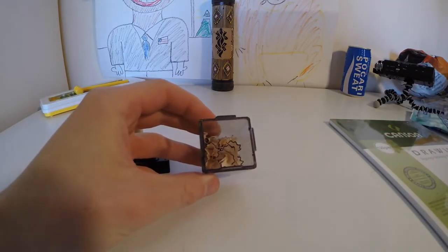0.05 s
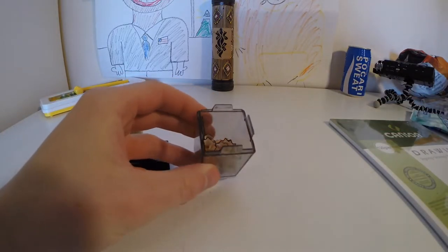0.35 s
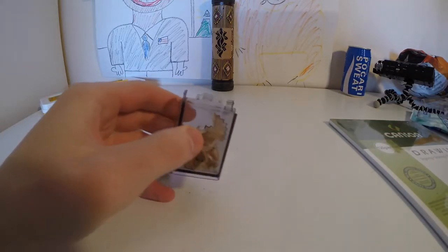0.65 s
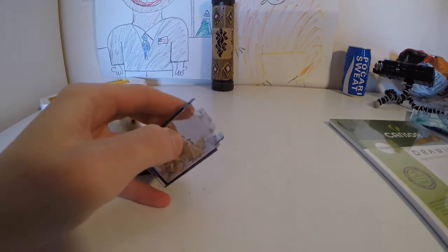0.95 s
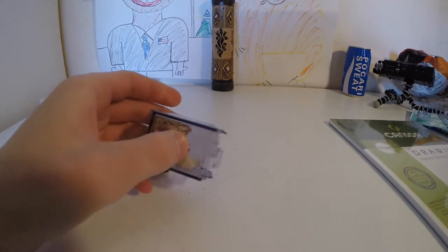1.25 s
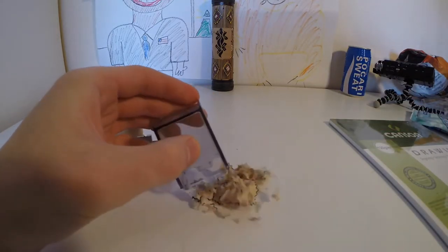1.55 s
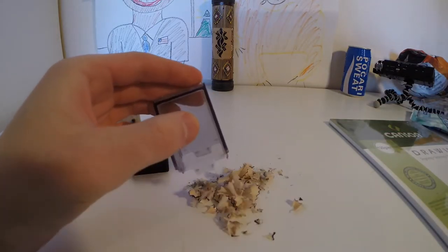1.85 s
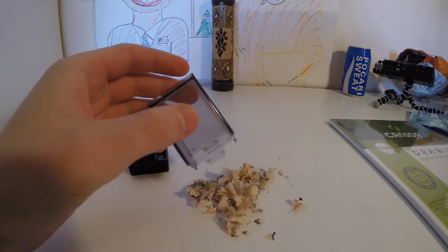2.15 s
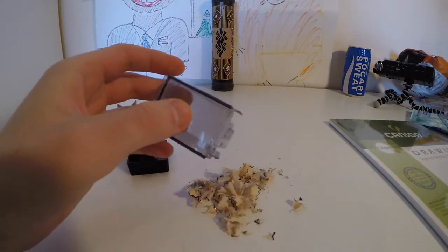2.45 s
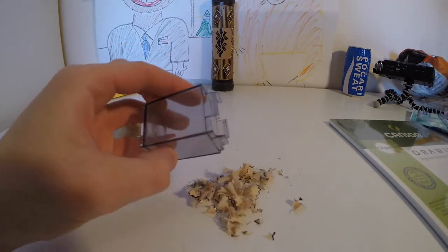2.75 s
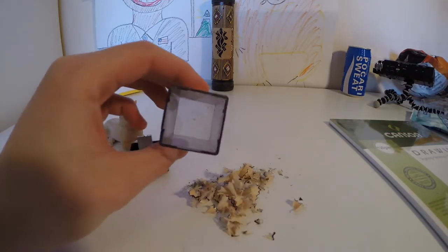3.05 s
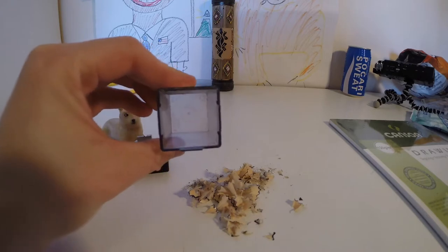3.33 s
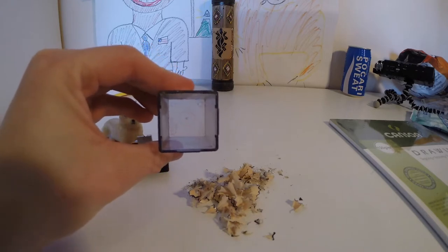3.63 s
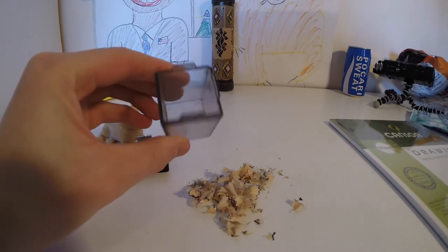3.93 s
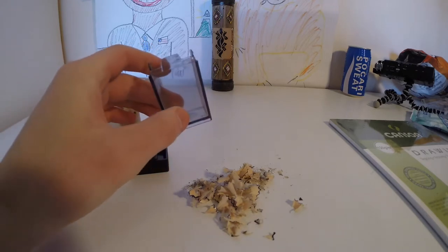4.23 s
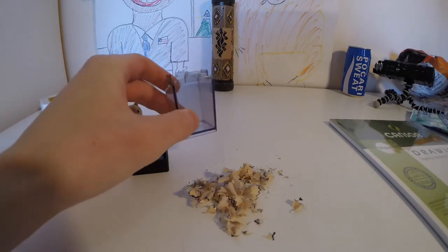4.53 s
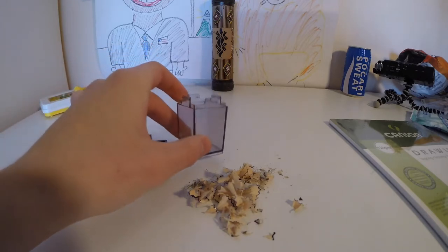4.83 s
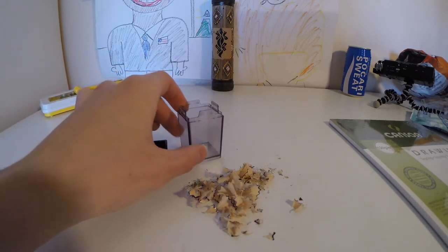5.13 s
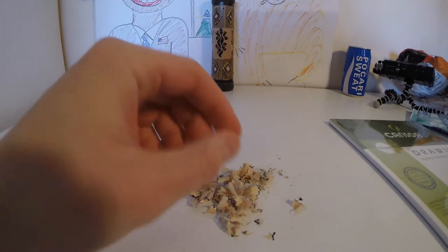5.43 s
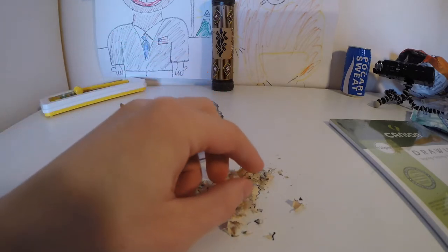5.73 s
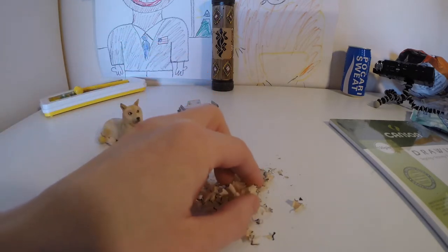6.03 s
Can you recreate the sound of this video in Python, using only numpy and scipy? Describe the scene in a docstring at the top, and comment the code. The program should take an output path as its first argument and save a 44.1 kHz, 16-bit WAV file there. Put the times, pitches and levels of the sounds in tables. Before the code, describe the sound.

In a quiet, softly rumbling room, dry shavings slide from a little plastic container that fingers scuff, then put down with a quick rattle.

```python
"""At a desk in a quiet room, a hand tips pencil shavings out of a small plastic box.
Fingertips drag, squeak and scuff on the plastic, and the dry flakes slide out in faint rustles of
tiny clicks. The box is bumped dully, set down on one edge and let fall onto its base: each knock
makes box and desk ring, the box chatters and squeaks briefly, and a faint ring swells and lingers.
Then the fingers stir the heap. Behind it all the room rumbles and hisses, with whines and one pip."""
import sys
import numpy as np
from scipy import signal
from scipy.fft import rfft, irfft
from scipy.io import wavfile

SR = 44100
rng = np.random.default_rng(int(sys.argv[2]) if len(sys.argv) > 2 else 0)


def unload_audio(sound):
    """Save the sound as a 16-bit wav file, at the path given as the first command line argument."""
    columns = np.transpose(np.atleast_2d(sound))
    # keep every value between -1 and 1, then stretch to whole-number steps
    steps = np.round(np.clip(columns, -1, 1) * 32767)
    wavfile.write(sys.argv[1], SR, steps.astype(np.int16))


N = 272538

# The tones that box and desk ring with. A ring time (t60) is the time taken to fade by 60 dB.
# (pitch [Hz], ring time [s], level bumped in the grip [dB], on an edge [dB], on the base [dB])
BOX_TONES = [(208, 0.095, -15, -14.5, -18), (278, 0.073, -10, -24, -23), (311, 0.09, -19, -19, -26),
             (383, 0.22, -12.5, -19, -30), (439.5, 0.212, -11, -11.5, -25),
             (482.5, 0.16, -11, -12.5, -15.5), (531.6, 0.143, -7, -23, -11.5), (569, 0.11, -7, -28, -11),
             (642, 0.037, -13, -21, -16.0), (710.0, 0.095, -2.5, -10.5, -9), (775, 0.073, -3.0, -14.5, -15),
             (813, 0.067, -19, -3, -3.5), (877, 0.13, -17.5, -5, -5.5), (938.6, 0.18, -19, -15.5, -6.5),
             (1008, 0.143, -19, -2, -2.5), (1120.0, 0.151, -4.5, -8, -5.5), (1219, 0.11, -17, -12.5, -18),
             (1360, 0.063, -11.5, -10.5, 1.0), (1420, 0.047, -12.0, -6.0, -3),
             (1510, 0.042, -5.5, -16, -12.0), (1652.0, 0.12, -23, -6, -10.5),
             (1768.0, 0.083, -24.0, -8, -1), (1954.0, 0.113, -20.0, -21.0, -12.5),
             (2118, 0.039, -4, -3.5, 2.0), (2203, 0.059, -5, -13.5, -5), (2840, 0.031, -30.0, -26.0, -13),
             (3010, 0.057, -30.0, -26.0, -5), (3350, 0.083, -29, -17, -8),
             (3690, 0.05, -30.0, -20.0, -10.5), (4297, 0.051, -29, -5, -0.5), (4710, 0.099, -30.0, -9, -13),
             (5250.0, 0.042, -30.0, -1, -16.5), (6200, 0.034, -30.0, -25.0, -7)]
# Knocks on the box. Hardness is the frequency above which a knock loses its treble.
# (time [s], level [dB], hardness [Hz], place of contact, rebounds [count])
KNOCKS = [(4.3985, -41, 1450, "grip", 0), (4.4075, -44, 1530, "grip", 0), (4.4253, -40.5, 950, "grip", 0),
          (4.4503, -39, 1440, "grip", 0), (4.470, -46, 776, "grip", 0), (4.537, -39.5, 910, "grip", 0),
          (4.5423, -42, 1640, "grip", 0), (5.0022, -30, 2280, "edge", 2), (5.055, -45, 1600, "base", 0),
          (5.069, -51, 850, "grip", 0), (5.0883, -43, 1450, "base", 0), (5.1227, -30.5, 2950, "base", 0),
          (5.1387, -31, 5530, "base", 0), (5.1411, -25.5, 3300, "base", 0), (5.2039, -50, 1000, "edge", 0)]
# The clack under each knock, made of many weaker tones: (frequency [Hz], level [dB])
CLACK_SPECTRUM = [(100, -16), (220, -9.5), (340, -11), (470, 0), (900, 3), (1400, 1), (2150, -2.5),
                  (2550, -10), (3100, -6), (4000, -12.5), (4700, -10), (5100, -12.5), (6500, -12),
                  (7500, -27), (14000, -8.5)]
# How the box bounces and rings at each place of contact:
# (first gap [s], level change per rebound [dB], ring time the fingers leave [share])
CONTACTS = {"grip": (0.011, -0.62, 0.77), "edge": (.0099, -4, 0.64), "base": (0.015, -1, 0.89)}
# The box catches and slips on skin or desk: (start [s], length [s], level [dB], pitch [Hz])
SQUEAKS = [(.970, 0.012, -53, 755), (4.407, 0.013, -48, 1134), (4.412, 0.0484, -43.5, 636),
           (5.06, .016, -49.5, 635), (5.087, 0.05, -41.5, 773.5), (5.203, 0.028, -50.5, 995)]
# The box drags on a fingertip or the desk: (start [s], length [s], level [dB], treble cutoff [Hz])
DRAGS = [(0.966, 0.066, -58, 850), (4.473, 0.046, -54, 850), (5.023, 0.025, -50, 1200)]
# Clumps of shavings slide out and are later stirred: (peak time [s], level [dB], length [s])
RUSTLES = [(1.435, -74, .12), (1.494, -59.5, 0.045), (1.544, -64.5, 0.062), (5.82, -70, 0.039),
           (5.905, -74, .06), (6.072, -72, 0.083), (6.17, -70, .09)]
# Resonances of the open box and the flakes in it: (pitch [Hz], width [Hz], level [dB])
HOLLOW_TONES = [(1460, 300, -2.5), (1750, 220, -4), (2870, 310, -5), (4540, 220, -9), (6140, 200, -7),
                (7420, 160, -10), (9250, 330, -18)]
# Flakes land, or the box ticks in the fingers: (time [s], level [dB], pitch [Hz], width [share of pitch])
TICKS = [(1.414, -62.5, 4430, .2), (1.484, -72, 8000, 0.54), (1.494, -71, 1750, 0.7),
         (1.489, -68, 6120, .06), (1.492, -67, 4580, .08), (1.495, -64.5, 2880, .15), (1.53, -74, 9000, .6),
         (1.584, -65.5, 2950, .2), (4.3005, -59, 2390, 1.9), (6.083, -65.5, 4650, 0.53)]
# Soft fingertip scuffs on the box: (peak time [s], level [dB], length [s], pitch [Hz], width [Hz])
SCUFFS = [(1.822, -67, .045, 3130, 1300), (1.834, -63, .04, 1550, 1000), (3.824, -60, 0.033, 1480, 400),
          (3.826, -67, .04, 3700, 2000)]
# Fine scratching as the emptied box turns in the fingers: (peak time [s], level [dB])
SCRATCH_STROKES = [(1.95, -85), (2.14, -86), (2.24, -84), (2.61, -85.5), (2.72, -88)]
# Echoes from the walls and things around the desk: (delay [s], gain [factor])
ECHOES = [(.0031, .25), (.0094, .2)]
# How long the room rings: (frequency [Hz], ring time [s])
ROOM_RING = [(200, 0.3), (1000, 0.24), (2200, 0.26), (7000, 0.18)]
# Steady rumble and hiss of the room: (frequency [Hz], relative level [dB])
ROOM_NOISE = [(8.8, -23), (15, 2.5), (59, -3), (105, -6), (140, -9.5), (181, -11.5), (257, -13.5),
              (374, -16), (500, -18.5), (546, -19), (1300, -24), (1900, -26.5), (2190, -27.5),
              (6050, -34.5), (15300, -51)]
# Faint, steady whines in the hiss: (pitch [Hz], width [Hz], level [dB])
WHINES = [(6160, 47, -88.5), (9860, 1300, -86), (12900, 690, -87)]


def box_knocks(clack_db=-4.5, clack_t60=0.071, build_s=0.00058,
               snap_db=-27, snap_t60=0.04, snap_top_hz=10000):
    """Each knock makes box and desk ring and clack; a softer contact leaves out the treble."""
    t, out = np.arange(SR // 4) / SR, np.zeros(N)
    hz, t60, *place_levels = np.transpose(BOX_TONES)[:, :, None]
    stagger = np.arange(len(hz))[:, None] ** 2  # the tones start out of step with each other
    waves = np.sin(2 * np.pi * hz * t + stagger)
    rings = {}  # the place of contact decides which tones sound, and how much the fingers damp them
    for (place, (*_, ring_share)), levels in zip(CONTACTS.items(), place_levels):
        tones = waves * amp(levels - 60 * t / (t60 * ring_share))
        rings[place] = hit_at_level(tones.sum(0), 0)
    build = 1 - np.exp(-t / build_s)  # the shaking takes a moment to spread over the desk
    for knock in KNOCKS:
        for s, db, hard_hz, place in chatter(*knock):
            clack = shaped_noise(CLACK_SPECTRUM, len(t)) * fade(t, clack_t60)
            body = build * (rings[place] + hit_at_level(clack, clack_db))
            add(out, s, hit_at_level(lowpass(body, hard_hz, order=4), db))
            snap = rng.standard_normal(len(t)) * fade(t, snap_t60)  # bright tick of plastic on the desk
            snap = lowpass(snap, snap_top_hz, order=6)
            add(out, s, hit_at_level(lowpass(snap, hard_hz, order=2), db + snap_db))
    return out


def chatter(s, db, hard_hz, place, rebounds, gap_share=0.7, hard_share=0.94):
    """Gives a knock and its rebounds, each sooner, weaker and softer than the one before."""
    gap_s, step_db, _ = CONTACTS[place]
    for k in range(round(rebounds) + 1):
        yield s, db + k * step_db, hard_hz * hard_share ** k, place
        s += gap_s * gap_share ** k


def box_squeaks(waver_share=0.015, waver_hz=120, octave_db=-17):
    """Quick sticking and slipping makes one low, slightly unsteady note with a weak octave above."""
    t, out = np.arange(SR // 10) / SR, np.zeros(N)
    for s, length, db, hz in SQUEAKS:
        waver = unit(lowpass(rng.standard_normal(len(t)), waver_hz, order=2))
        phase = 2 * np.pi * np.cumsum(hz * (1 + waver_share * waver)) / SR
        tone = unit(np.sin(phase) + amp(octave_db) * np.sin(2 * phase))
        loudness = held(0, length, rise_s=0.0025, fall_s=0.0047)[:len(t)]
        add(out, s, amp(db) * loudness * tone)
    return out


def box_drags(slips_per_s=1500, width_hz=53):
    """Many tiny slips stir the tones of the held box."""
    slips = random_slips(slips_per_s)
    body = sum(amp(grip_db) * resonate(slips, hz, width_hz) for hz, _, grip_db, *_ in BOX_TONES)
    out = np.zeros(N)
    for s, length, db, top_hz in DRAGS:
        loudness = amp(db) * held(s, length, rise_s=0.021, fall_s=0.04)
        out += loudness * unit(lowpass(body, top_hz, order=2))
    return out


def shavings(clicks_per_s=1500, spread_db=2.8, low_hz=1400, top_hz=10000):
    """Dry flakes brush each other and the box in many tiny clicks of uneven size."""
    sizes = amp(spread_db * np.minimum(rng.exponential(1, N), 3))
    signs = rng.choice([-1, 1], N)
    clicks = sizes * signs * (rng.random(N) < clicks_per_s / SR)
    clicks -= lowpass(clicks, low_hz, order=1)  # thins out the bass
    rustle = unit(lowpass(hollow_box(clicks, direct=0.11), top_hz, order=3))
    return rustle * sum(swell(*clump) for clump in RUSTLES)


def ticks(t60=0.041):
    """A landing flake or a light tick of the box is a short burst of noise around its own pitch."""
    t, out = np.arange(SR // 10) / SR, np.zeros(N)
    for s, db, hz, width_share in TICKS:
        burst = rng.standard_normal(len(t)) * fade(t, t60)
        tick = resonate_twice(burst, hz, width_share * hz)
        add(out, s, hit_at_level(hollow_box(tick, direct=1.0), db))
    return out


def hollow_box(x, direct):
    """The open box adds its resonances to a small sound; `direct` is the share that passes unchanged."""
    return direct * x + sum(amp(db) * resonate(x, hz, width) for hz, width, db in HOLLOW_TONES)


def finger_scuffs(slips_per_s=2500):
    """Skin slides a little on the plastic: a swell of tiny slips around one pitch."""
    slips = random_slips(slips_per_s)
    return sum(swell(s, db, length) * unit(resonate_twice(slips, hz, width))
               for s, db, length, hz, width in SCUFFS)


def fine_scratching(slips_per_s=30, unevenness=0.27, slip_t60=0.018, hz=9900, width_hz=1500):
    """The box turns in the fingers in separate, unevenly spaced slips, each a very short, high fizz."""
    gaps = np.exp(unevenness * rng.standard_normal(150)) / slips_per_s
    slip_fade = fade(np.arange(SR // 20) / SR, slip_t60)
    slips = np.zeros(N)
    for s in np.cumsum(gaps):
        add(slips, s, slip_fade)
    fizz = unit(resonate_twice(slips * rng.standard_normal(N), hz, width_hz))
    return fizz * sum(swell(s, db, length_s=0.17) for s, db in SCRATCH_STROKES)


def lingering_ring(ring_db=-72.5, hz=1905, width_hz=87):
    """A faint ring near 1.9 kHz swells and lingers around the knocks as the box is set down."""
    loudness = amp(ring_db) * held(start_s=4.68, length_s=0.99, rise_s=0.35, fall_s=0.35)
    return loudness * narrow_noise(hz, width_hz)


def room_echo(x, tail_db=-13, gap_s=0.0065):
    """The room adds two close echoes, then a short tail whose treble dies first."""
    hz, t, spectrum = signal.stft(rng.standard_normal(SR // 2), SR, nperseg=256)
    spectrum *= fade(t, look_up(ROOM_RING, hz)[:, None])
    _, tail = signal.istft(spectrum, SR, nperseg=256)
    response = np.zeros(SR)
    add(response, gap_s, amp(tail_db) * tail / np.linalg.norm(tail))
    for delay, gain in ECHOES:
        add(response, delay, [gain])
    return x + signal.fftconvolve(x, response)[:N]


def background(noise_db=-54.5, pip_db=-70, pip_hz=10980):
    """Room rumble and hiss with faint whines and one thin, high pip."""
    whines = sum(amp(db) * narrow_noise(hz, width) for hz, width, db in WHINES)
    steady = amp(noise_db) * shaped_noise(ROOM_NOISE, N)
    pip = amp(pip_db) * unit(np.sin(2 * np.pi * pip_hz * np.arange(N) / SR))
    pip *= held(start_s=2.408, length_s=0.022, rise_s=0.004, fall_s=0.004)
    return steady + whines + pip


def amp(db):
    """Turns decibels into a gain."""
    return 10 ** (np.asarray(db) / 20)


def unit(x):
    """Scales a sound to an average strength (rms) of 1."""
    return x / np.sqrt(np.mean(x ** 2) + 1e-20)


def hit_at_level(x, db):
    """Scales a hit so that its first hundredth of a second has the given level."""
    return amp(db) * x / np.sqrt(np.mean(x[:SR // 100] ** 2))


def fade(t, t60):
    """A gain that drops by 60 dB every t60 seconds."""
    return amp(-60 * t / t60)


def held(start_s, length_s, rise_s, fall_s):
    """A gain that rises, holds until the length is over, then falls."""
    t = np.arange(N) / SR - start_s
    return np.clip(np.minimum(t / rise_s, 1 - (t - length_s) / fall_s), 0, 1)


def swell(peak_s, db, length_s, end_db=-18):
    """A gain with a rounded rise and fall; end_db is its level at both ends, against the peak."""
    from_peak = 2 * (np.arange(N) / SR - peak_s) / length_s
    return amp(db + end_db * from_peak ** 2)


def add(mix, s, sound):
    """Mixes a sound in at time s."""
    part = mix[round(s * SR):][:len(sound)]
    part += sound[:len(part)]


def look_up(table, hz):
    """Reads between the rows of a table, along a log-frequency axis."""
    row_hz, values = np.transpose(table)
    return np.interp(np.log(hz + 1), np.log(row_hz + 1), values)


def random_slips(per_s):
    """Tiny clicks of random size at random times."""
    return rng.standard_normal(N) * (rng.random(N) < per_s / SR)


def shaped_noise(spectrum, size):
    """Noise of strength 1 with the given spectrum."""
    gains = amp(look_up(spectrum, np.fft.rfftfreq(size, 1 / SR)))
    return unit(irfft(rfft(rng.standard_normal(size)) * gains, size))


def narrow_noise(hz, width_hz):
    """Noise of strength 1 around one pitch."""
    return unit(resonate(rng.standard_normal(N), hz, width_hz))


def lowpass(x, hz, order):
    """Turns down the treble above hz; a higher order cuts more steeply."""
    return signal.sosfilt(signal.butter(order, min(hz, SR / 2 - 100), fs=SR, output="sos"), x)


def resonate(x, hz, width_hz):
    """One resonance: keeps the sound near hz and turns down the rest."""
    return signal.lfilter(*signal.iirpeak(min(hz, SR / 2 - 100), hz / width_hz, fs=SR), x)


def resonate_twice(x, hz, width_hz):
    """The same resonance twice over, for a clearer pitch."""
    return resonate(resonate(x, hz, width_hz), hz, width_hz)


def scene():
    """Box, shavings and fingers sound in the room, over its steady noise, in one channel."""
    box = box_knocks() + box_drags() + box_squeaks()
    small_sounds = shavings() + ticks() + finger_scuffs() + fine_scratching()
    return (room_echo(box + small_sounds) + background() + lingering_ring())[None]


def record(dry):
    """Cuts off the very highest treble."""
    treble_cut = signal.firwin(511, cutoff=15400, window=("kaiser", 9), fs=SR)
    return signal.oaconvolve(dry, treble_cut[None], "same")


dry = scene()
out = record(dry)
unload_audio(out)
```